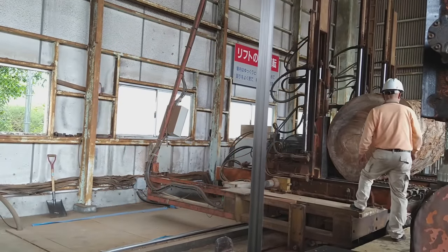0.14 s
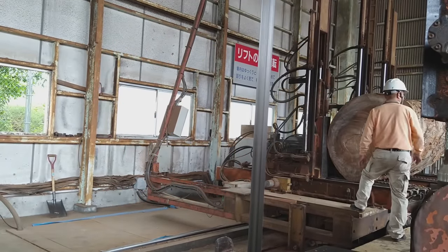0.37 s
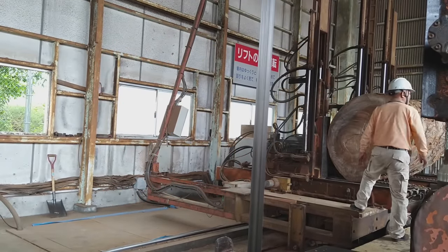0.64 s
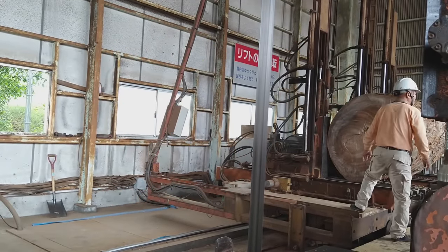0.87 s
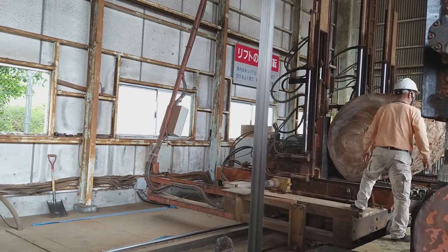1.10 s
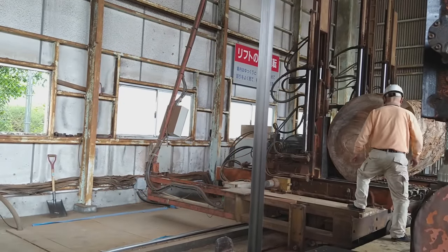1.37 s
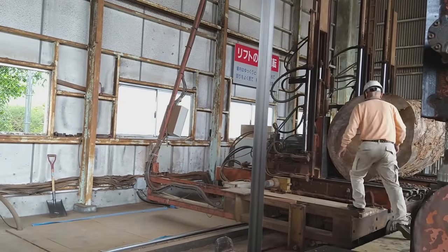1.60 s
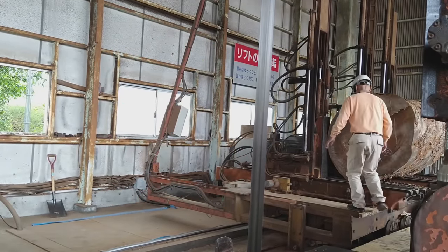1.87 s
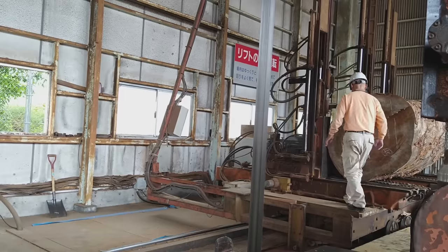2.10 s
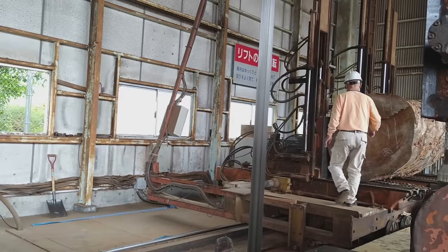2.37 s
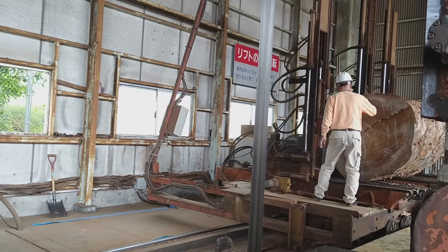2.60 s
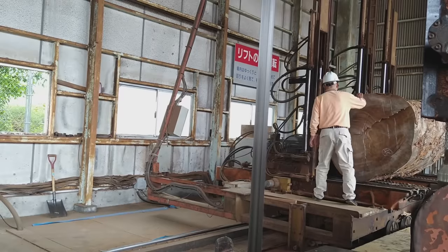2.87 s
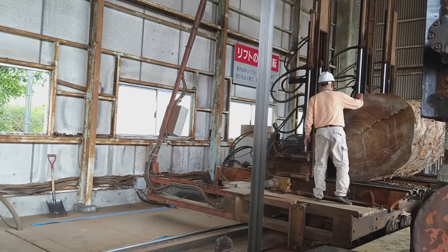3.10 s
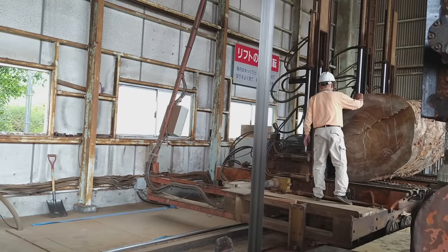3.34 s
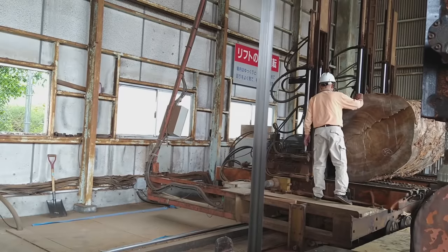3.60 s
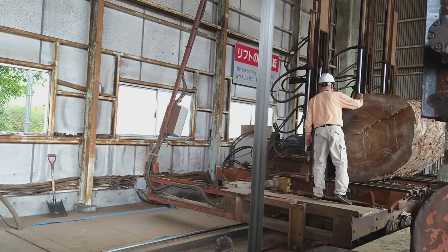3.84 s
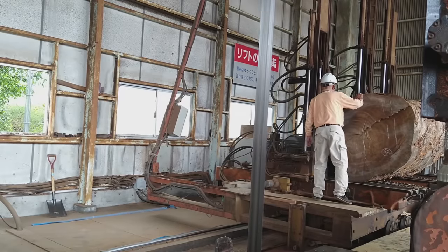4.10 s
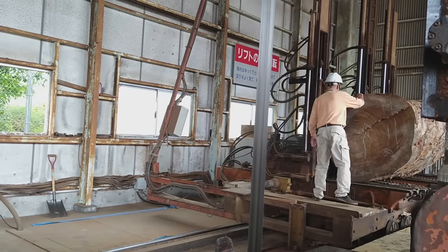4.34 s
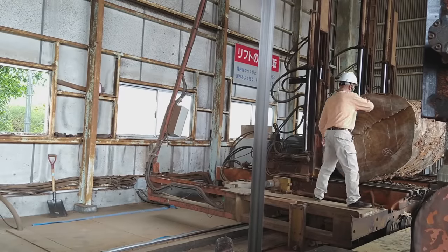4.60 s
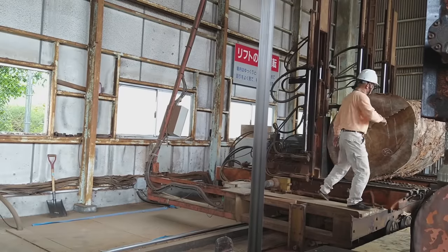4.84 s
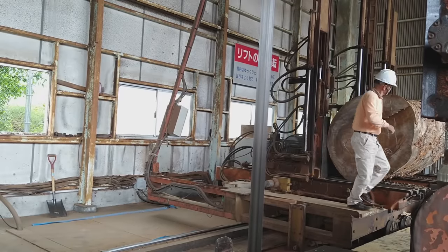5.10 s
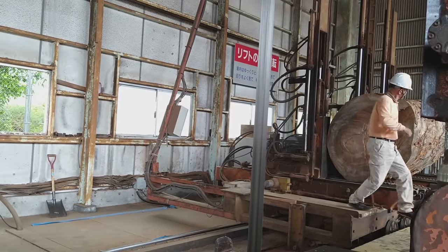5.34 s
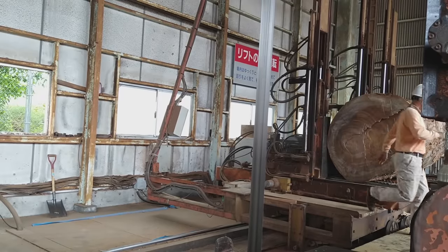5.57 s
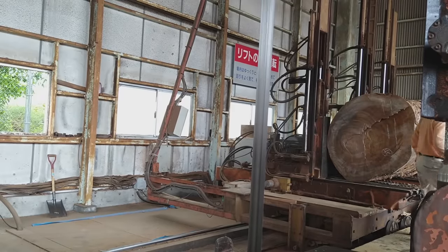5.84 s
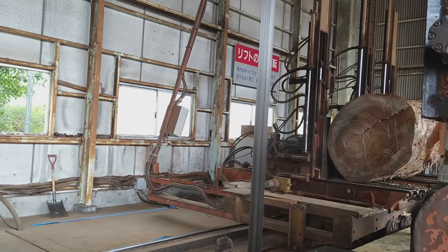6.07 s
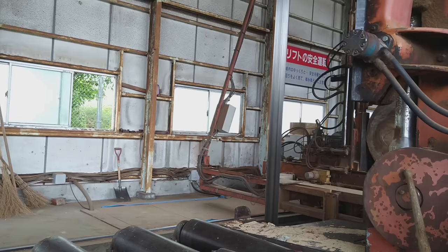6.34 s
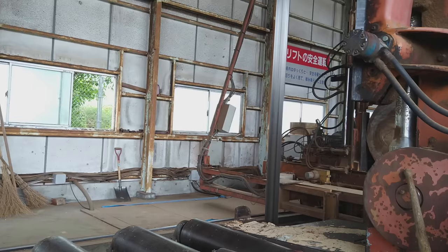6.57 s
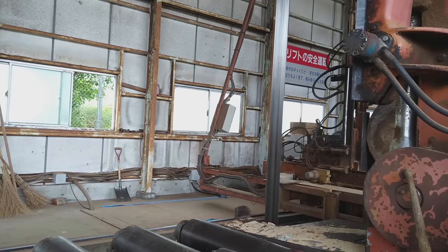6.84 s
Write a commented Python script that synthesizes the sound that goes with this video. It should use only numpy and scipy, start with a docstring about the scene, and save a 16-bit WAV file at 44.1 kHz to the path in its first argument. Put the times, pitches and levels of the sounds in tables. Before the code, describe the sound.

A continuous wall of sawmill machinery: broad motor wash, low beating hum, airy high hiss with faint gliding whistles, and thin singing blade tones. Rough steel carriage rolling grows from the left and turns brighter and more ringing through the middle. An abrupt short dropout leaves pure silence, then the idling saw snaps back, a little duller, carriage at rest. Wide stereo microphone in a hard metal shed, with small dips in level.

```python
"""A large band saw idles in a tin-walled sawmill: thin throbbing wheel and guide tones as near sines, motor hum
as beating low tones, air hiss and faint whistles as shaped noise. A log carriage rolls up on the left: noise-
driven steel modes and throbbing tones ring, and a few thin squeals whistle high above. A broad noise roar lies
behind. The sound drops out for a third of a second and returns with the carriage at rest."""
import sys
import numpy as np
from scipy import signal
from scipy.io import wavfile
from scipy.ndimage import uniform_filter1d

SR = 44100
rng = np.random.default_rng(int(sys.argv[2]) if len(sys.argv) > 2 else 0)


def inscribe(sig):
    """Save sig as 16-bit PCM at rate SR to the path in sys.argv[1].

    A 1-D sig is mono; a 2-D sig holds one channel per row.
    Samples are clipped to [-1, 1] before scaling.
    """
    pcm = np.round(np.clip(np.atleast_2d(sig).T, -1, 1) * 32767)
    wavfile.write(sys.argv[1], SR, pcm.astype(np.int16))


def invert_db(level):
    """Linear amplitude ratio for a level in decibels (20 dB per decade), elementwise."""
    return 10 ** (np.asarray(level, dtype=float) / 20)


N = 306495
T = np.arange(N) / SR
FFT_SIZE, HOP = 2048, 512
BIN_HZ = np.fft.rfftfreq(FFT_SIZE, 1 / SR)
FRAME_T = np.arange(N // HOP + 5) * HOP / SR

# Thin tones of blade, wheels and guides: f/Hz, left level/dB, right level/dB
SAW_TONES = [(66.6, -50, -50), (206.2, -44, -45), (292.8, -45, -46), (393.2, -43, -44), (541.8, -50, -48),
             (563.4, -40, -44), (587.4, -45, -53), (721.7, -46, -45), (774.4, -46, -50), (786.4, -45, -45),
             (815.2, -41, -44), (872.7, -44, -46), (918.3, -48, -43), (939.8, -42, -58), (997.4, -43, -58),
             (1004.6, -39, -47), (1019.0, -41, -46), (1031.0, -41, -47), (1100.5, -45, -46),
             (1160.4, -42, -42), (1210.7, -45, -43), (1289.9, -40, -43), (1299.4, -42, -45),
             (1311.5, -39, -45), (1321.0, -42, -46), (1417.0, -41, -42), (1469.6, -39, -40),
             (1476.8, -42, -41), (1503.3, -41, -40), (1721.5, -40, -43), (1847.5, -38, -42)]
WHEEL_HZ, BLADE_LAP_HZ = 4.76, 1.72
FAINT_TONES, FAINT_BASE_DB = 50, -53.5

# Low machine tones that beat: f/Hz, left level/dB, right level/dB
HUM_TONES = [(163.7, -32.5, -34.6), (168.27, -45, -48), (168.81, -39.5, -42.4), (180.1, -42.6, -41.8)]
IN_STEP_S = 0.04
# Orders of a slow shaft: multiple of SHAFT_HZ, left level/dB
SHAFT_ORDERS = [(5, -49), (6, -48), (7, -50), (11, -47), (13, -48)]
SHAFT_HZ = 16.88

# Slow change of the blade hiss: t/s, level/dB, left minus right/dB, brightness/(dB per octave)
HISS_COURSE = [(0, -17, 1.5, -0.9), (1.0, -17, 0, -0.5), (1.7, -17, 1, -1), (2.9, -17.5, .3, -1.5),
               (3.7, -17, -0.3, -0.3), (4.8, -18, -1.5, -0.5), (5.3, -17.5, 1, -1.7), (6.3, -18.5, 0, 0),
               (6.64, -16.5, 2, 0.5), (6.95, -17, 2.5, -1.2)]
# Relative hiss spectrum, each microphone port with its own peak: f/Hz, left/(dB per Hz), right/(dB per Hz)
HISS_COLOUR = [(3000, -20, -20), (4300, -10, -10), (5000, -11, -11), (6000, -8, -9), (7200, -5, -7),
               (7800, 0, -4), (8500, 0, -1), (9500, -4, 1), (10100, -6, 0), (10600, -10, -3),
               (12000, -13, -8), (13000, -12, -8), (14200, -13, -9), (15700, -10.5, -9)]
# Faint fuzzy whistles: start t/s, end t/s, first f/Hz, last f/Hz, left peak level/dB, right peak level/dB
WHISTLES = [(.7, 1.9, 8240, 8290, -27, -24), (1.9, 5.6, 8260, 8220, -34, -34),
            (5.5, 6.9, 8180, 7960, -26, -29), (3.1, 5.2, 13150, 13120, -36, -33),
            (5.1, 7.0, 13120, 13480, -35, -31), (5.8, 6.9, 13300, 14400, -36, -41),
            (5.5, 6.7, 11100, 11150, -42, -36), (5.7, 6.7, 11650, 11650, -44, -38),
            (5.5, 6.7, 12700, 12700, -44, -38), (3.4, 4.6, 15560, 15560, -37, -36),
            (3.6, 6.0, 13650, 13600, -42, -40)]

# Pitches of the ringing carriage and rails: f/Hz
CARRIAGE_HZ = [570, 1170, 1310, 1490, 1580, 1840, 1950, 2025, 2190, 2440, 2640, 2000, 3700]
# Their modes, in the same order: nominal width/Hz, left and right level/dB against the rolling level
CARRIAGE_MODES = [(40, -27, -31.5), (64, -10.5, -20), (50.4, -15.5, -22), (90, -8, -16), (50, -11, -19.5),
                  (60, -12, -16), (60, -6.5, -17.5), (50, -12, -24.5), (70, -8, -16), (60, -10.5, -22.5),
                  (90, -13.5, -26.5), (900, -10.5, -18.5), (600, -16, -22.5)]
# Carriage tones: f/Hz, left level/dB, right level/dB, at ROLLING_FULL_DB and zero brightness
CARRIAGE_TONES = [(1153.3, -37, -46), (1182.1, -37, -47), (1239.6, -38, -54), (1575.3, -37, -49),
                  (1596.8, -37, -57), (1913.3, -42, -43), (1942.1, -35, -46), (1954.1, -32, -46),
                  (2021.2, -38, -51), (2174.6, -37, -55), (2220.3, -40, -47), (2359.1, -43, -50),
                  (2438.5, -39, -48), (2448.1, -39, -47), (2603.7, -42, -52), (2666.1, -42, -53)]
# Rolling carriage, its loudness and brightness changing separately: t/s, level/dB, brightness/(dB per octave)
ROLLING = [(0, -28.5, -1), (.9, -30.5, -2), (1.4, -23, -0.5), (2.0, -18, 0.7), (2.8, -19.5, 0.5),
           (3.6, -20.5, 2.2), (4.1, -19.5, 4), (4.55, -19, 2), (5.2, -19, 4), (6.3, -19.5, -0.2)]
ROLLING_AT_REST_DB, ROLLING_FULL_DB = -38, -21

# Relative roar spectrum: f/Hz, density/(dB per Hz)
ROAR_COLOUR = [(30, -48.5), (50, -30), (66, -18.5), (80, -15), (115, -13.5), (150, -12.5), (200, -13.5),
               (250, -14.5), (450, -17.5), (600, -13), (1000, -13.5), (1600, -11), (2300, -12.5),
               (3000, -13.5), (4000, -19.5)]
# Side lean of the roar: f/Hz, left minus right/dB
ROAR_LEAN = [(60, 2), (180, 2.5), (550, 0.5), (1650, 3), (4970, 2.0), (15000, -7.5)]
ROAR_DB = -21.5
ROAR_DULLER_DB_PER_OCTAVE = -0.5  # above 1 kHz, once the sound returns
# Likeness of the noise at the two ports: f/Hz, correlation
PORT_LIKENESS = [(60, .97), (130, .97), (290, .85), (640, .55), (1410, .36), (3100, .25), (6820, .15),
                 (15000, .15)]

# Brief dips and swells of the whole sound: start t/s, length/s, left gain/dB, right gain/dB
DIPS = [(0.175, 0.06, -0.8, -1.4), (0.854, 0.097, -1.5, 0.7), (0.987, 0.16, 1, -0.3),
        (1.817, 0.081, -2.6, -1.3), (1.865, .09, 0.5, -0.8), (2.688, 0.075, -.2, -2), (3.1, 0.091, 0, -2),
        (3.535, 0.096, -2, -0.5), (3.946, 0.13, -2, 0), (4.332, 0.059, -1.7, -0.7), (4.57, 0.13, -2.2, 0.3),
        (4.76, .07, -0.7, -1), (5.065, 0.13, -0.3, 1.1), (5.68, .14, 0, -1.3)]
DIP_EDGE_S, FLUTTER_DB, FLUTTER_TOP_HZ = 0.025, 0.54, 10
# Dropout: silent from t/s, sound back t/s
DROPOUT_S = (6.3195, 6.6365)
CUT_FADE_S, EDGE_HZ = 0.0008, 15740


def evened(x):
    """Scales to rms 1."""
    return x / np.sqrt(np.mean(x ** 2) + 1e-20)


def read(points, hz):
    """Reads a spectrum table on a log-frequency axis."""
    f, value = np.transpose(points)
    return np.interp(np.log(hz + 1), np.log(f + 1), value)


def sides(left_db, right_db):
    """Gains of the two channels."""
    return invert_db(np.array([[left_db], [right_db]]))


def columns(rows, t):
    """Reads every column of a curve table at times t."""
    s, *rest = np.transpose(rows)
    return [np.interp(t, s, c) for c in rest]


def wander(t, top_hz):
    """Slow chance variation of rms 1: sines from 0.2 Hz to top_hz, weaker as they get faster."""
    rates_hz = np.geomspace(0.2, top_hz, num=16)
    return evened(sum(np.sin(2 * np.pi * (f * t + rng.random())) / np.sqrt(f) for f in rates_hz))


def resonate(x, hz, width_hz):
    """One-pole resonance: shifts hz down to zero, smooths, and shifts back."""
    turn = np.exp(2j * np.pi * np.cumsum(hz * np.ones(N)) / SR)
    r = np.exp(-np.pi * width_hz / SR)
    smooth = signal.lfilter([1 - r], [1, -r], x / turn)
    return evened((turn * smooth).real)


def tone(hz, left_db, right_db, wheel, lap, blur_hz, waver_db):
    """A near sine that throbs with each wheel turn and blade lap, and drifts a little."""
    t, start = T[::64], rng.random(4)
    throb = 1 + wheel * np.cos(2 * np.pi * (WHEEL_HZ * t + start[0]))
    throb = throb * (1 + lap * np.cos(2 * np.pi * (BLADE_LAP_HZ * t + start[1])))
    throb = throb * invert_db(waver_db * wander(t, 3))
    drift_turns = np.cumsum(blur_hz * wander(t, 8)) * 64 / SR
    phase = 2 * np.pi * (hz * T + np.interp(T, t, drift_turns) + start[2])
    # the shed scatters high tones between the ports
    lag = 2 * np.pi * np.clip(hz / 2000, 0, 1) * (start[3] - 0.5)
    size = np.sqrt(2) * np.interp(T, t, evened(throb))
    return size * sides(left_db, right_db) * np.sin([phase, phase + lag])


def noise(gain, t, patchy_db, drift_db, swell_db):
    """Random short-time spectra for two ports, with small patches, broad slow drifts of colour and a flicker."""
    a, b, c, d, patches, drifts = rng.standard_normal((len(t), len(BIN_HZ), 6)).T
    # smoothed over bins, then frames
    patches = evened(uniform_filter1d(uniform_filter1d(patches, size=16, axis=0), size=10, axis=1))
    drifts = evened(uniform_filter1d(uniform_filter1d(drifts, size=50, axis=0), size=40, axis=1))
    same = np.clip(read(PORT_LIKENESS, BIN_HZ), -1, 1)[:, None]
    left = a + 1j * b
    right = same * left + np.sqrt(1 - same ** 2) * (c + 1j * d)
    change_db = patchy_db * patches + drift_db * drifts + swell_db * wander(t, 19)
    spectra = np.array([left, right]) * gain * invert_db(change_db)
    return signal.istft(spectra, nperseg=FFT_SIZE, noverlap=FFT_SIZE - HOP)[1][:, :N]


def saw_tones():
    """Blade, wheels and guides sing thin throbbing lines, over a thicket of fainter ones at chance pitches."""
    place, left, right = rng.random((FAINT_TONES, 3)).T
    faint_hz = 250 * 8.0 ** place
    faint_left_db = FAINT_BASE_DB + 6 * place + 4 * left
    faint_right_db = FAINT_BASE_DB + 5 * place + 4 * right - 6.0
    rows = [*SAW_TONES, *zip(faint_hz, faint_left_db, faint_right_db)]
    return sum(tone(*row, wheel=0.49, lap=0.28, blur_hz=0.3, waver_db=2.0) for row in rows)


def hum():
    """Steady low tones, whose beats make the hum pulse, and weak orders of a slow shaft."""
    out = np.zeros((2, N))
    for hz, left_db, right_db in HUM_TONES:
        wave = np.sqrt(2) * np.cos(2 * np.pi * hz * (T - IN_STEP_S))  # all in step at IN_STEP_S
        out += sides(left_db, right_db) * invert_db(0.9 * wander(T, 3.2)) * wave
    for order, db in SHAFT_ORDERS:
        out += tone(order * SHAFT_HZ, db, db - 1.5, wheel=0.2, lap=0.2, blur_hz=0.3, waver_db=1.5)
    return out


def hiss():
    """Teeth cut the air: coloured noise whose level, side and brightness drift slowly."""
    bright_db = columns(HISS_COURSE, FRAME_T)[2]
    level_db, lean_db, _ = columns(HISS_COURSE, T)
    hz, *sides_db = np.transpose(HISS_COLOUR)
    colour_db = np.array([read(np.transpose([hz, db]), BIN_HZ) for db in sides_db])
    colour = invert_db(colour_db) * (BIN_HZ > hz[0])
    tilt_db = np.log2((BIN_HZ[:, None] + 1) / 8800) * bright_db
    air = noise(colour[:, :, None] * invert_db(tilt_db), FRAME_T, patchy_db=0.74, drift_db=0.5, swell_db=0.31)
    air = air / air.mean(axis=0).std()  # mid channel to rms 1
    return invert_db(level_db + np.array([lean_db, -lean_db]) / 2) * air


def whistles():
    """Narrow gliding resonances on noise that swell and fade, none after the dropout."""
    out = np.zeros((2, N))
    for start, end, from_hz, to_hz, left_db, right_db in WHISTLES:
        along = np.clip((T - start) / (end - start), 0, 1)
        ring = resonate(rng.standard_normal(N), from_hz + along * (to_hz - from_hz), width_hz=100)
        swell = np.sqrt(np.sin(np.pi * along) + 1e-12)
        out += sides(left_db, right_db) * swell * ring * (T < DROPOUT_S[0])
    return out


def carriage():
    """Rough wheel-rail contact, as noise, drives steel modes that swell separately; throbbing tones join in."""
    level_db, bright_db = columns(ROLLING, T)
    level_db = np.where(T > DROPOUT_S[0], ROLLING_AT_REST_DB, level_db)
    modes = np.zeros((2, N))
    for hz, (width, left_db, right_db) in zip(CARRIAGE_HZ, CARRIAGE_MODES):
        near, scattered = rng.standard_normal((2, N))
        pass_hz = 1.42 * width  # two passes narrow the resonance
        drives = (near, 0.72 * near + scattered)
        pair = np.array([resonate(resonate(v, hz, pass_hz), hz, pass_hz) for v in drives])
        swell_db = np.interp(T, T[::64], 0.7 * wander(T[::64], 4))
        modes += sides(left_db, right_db) * invert_db(swell_db + bright_db * np.log2(hz / 1800)) * pair
    tones = np.zeros((2, N))
    for row in CARRIAGE_TONES:
        bright = invert_db(bright_db * np.log2(row[0] / 1800))
        tones += tone(*row, wheel=0.28, lap=0.2, blur_hz=1.49, waver_db=2.0) * bright
    return invert_db(level_db) * (modes + invert_db(-ROLLING_FULL_DB) * tones)


def roar():
    """The shed's wash of motors and wheels: noise coloured by the shed's fixed peaks."""
    lean_db = read(ROAR_LEAN, BIN_HZ) / 2
    colour_db = read(ROAR_COLOUR, BIN_HZ)
    colour_db = colour_db - 30 * np.log2(np.maximum(BIN_HZ / ROAR_COLOUR[-1][0], 1))
    rough_db = 2.0 * rng.standard_normal(len(BIN_HZ))
    colour_db = colour_db + np.array([lean_db, -lean_db]) + rough_db
    octaves = np.log2(np.maximum(BIN_HZ / 1000, 1))
    later_db = ROAR_DULLER_DB_PER_OCTAVE * np.outer(octaves, FRAME_T > DROPOUT_S[0])
    gain = invert_db(colour_db[:, :, None] + later_db)
    wash = noise(gain, FRAME_T, patchy_db=0.64, drift_db=0.73, swell_db=0.33)
    return invert_db(ROAR_DB) * evened(wash)


def unsteadiness():
    """Gain of each side: brief soft-edged dips and swells over a faint chance flutter."""
    t = T[::64]
    db = FLUTTER_DB * np.array([wander(t, FLUTTER_TOP_HZ), wander(t, FLUTTER_TOP_HZ)])
    for start, length, left_db, right_db in DIPS:
        inside = np.clip(0.5 + np.minimum(t - start, start + length - t) / DIP_EDGE_S, 0, 1)
        db = db + np.outer([left_db, right_db], inside)
    return invert_db(np.array([np.interp(T, t, side) for side in db]))


def scene():
    """The idling saw with the carriage rolling up, before the roar of the shed."""
    sources = saw_tones() + hum() + hiss() + whistles() + carriage() + roar()
    return unsteadiness() * sources


def roll_off(x):
    """The treble ends steeply here."""
    return signal.sosfilt(signal.butter(12, 17090, fs=SR, output="sos"), x)


def record(dry):
    """Band limit, clipped peaks, and a brief cut in the sound."""
    edge = signal.firwin(1023, EDGE_HZ, window=("kaiser", 9), fs=SR)
    limited = signal.oaconvolve(dry, edge[None], "same")
    on = np.clip((DROPOUT_S[0] - T) / CUT_FADE_S, 0, 1) + (T > DROPOUT_S[1])
    return roll_off(np.clip(limited, -1, 1) * on)


dry = scene()
out = record(dry)
inscribe(out)
```